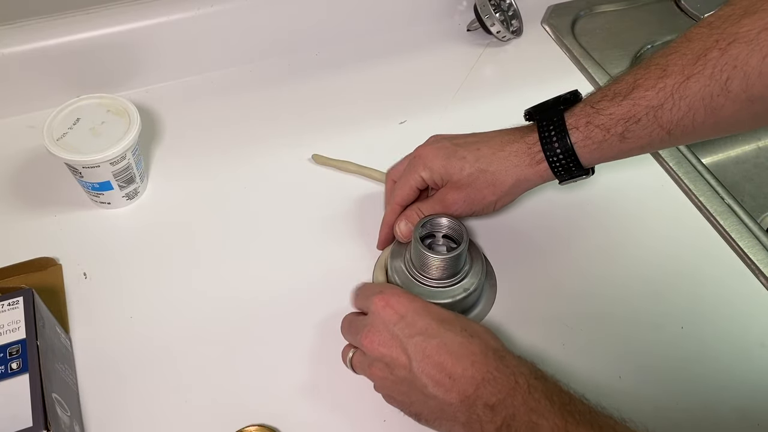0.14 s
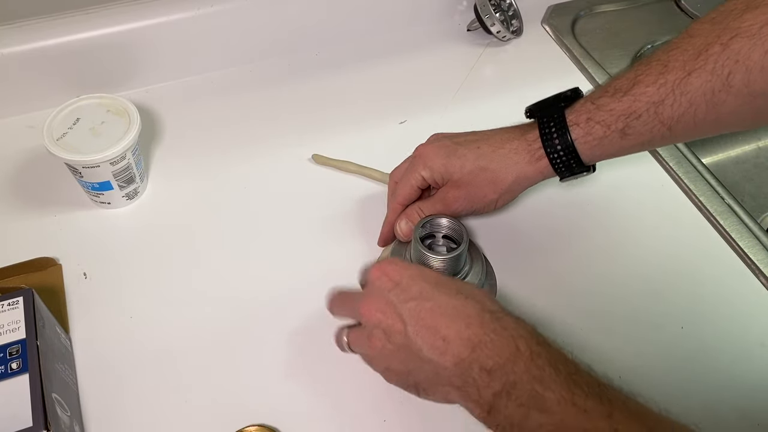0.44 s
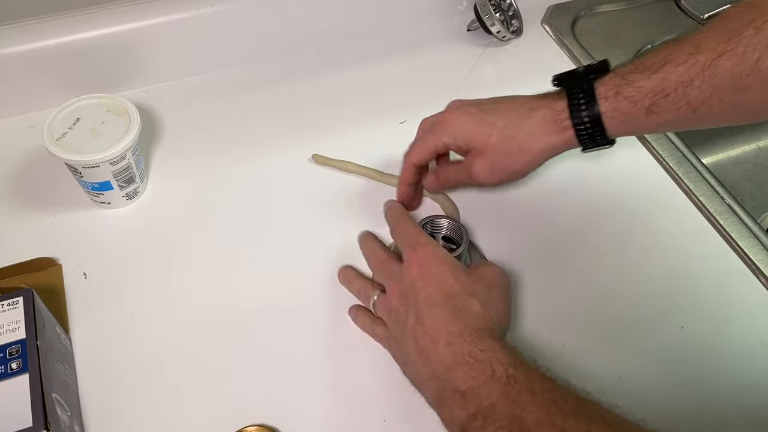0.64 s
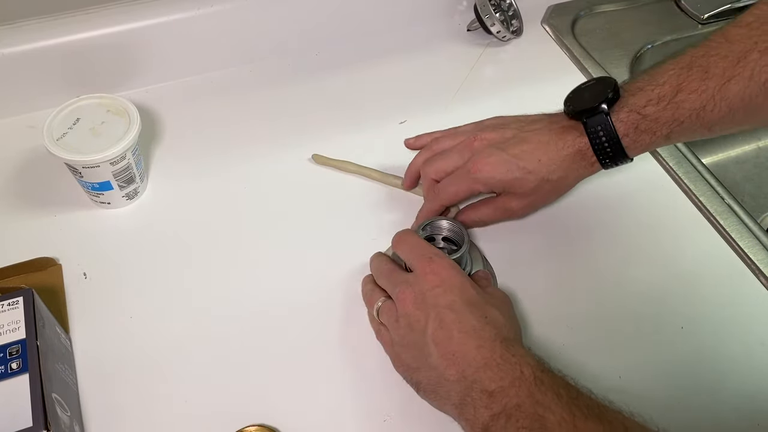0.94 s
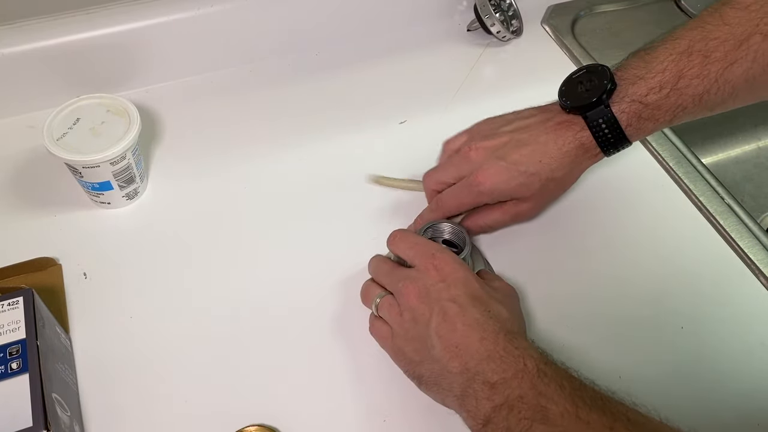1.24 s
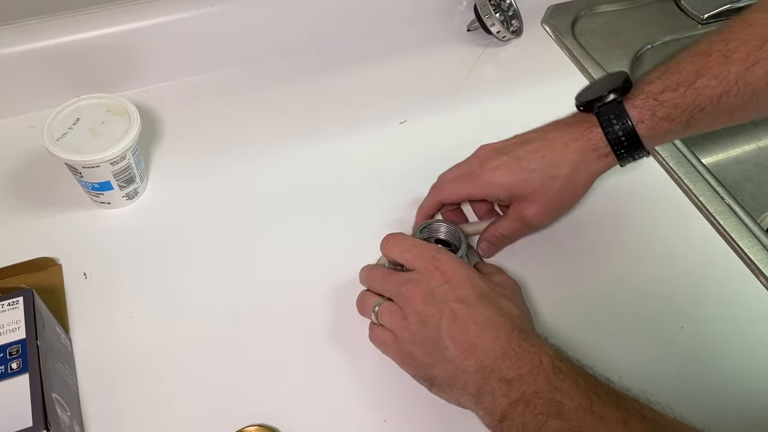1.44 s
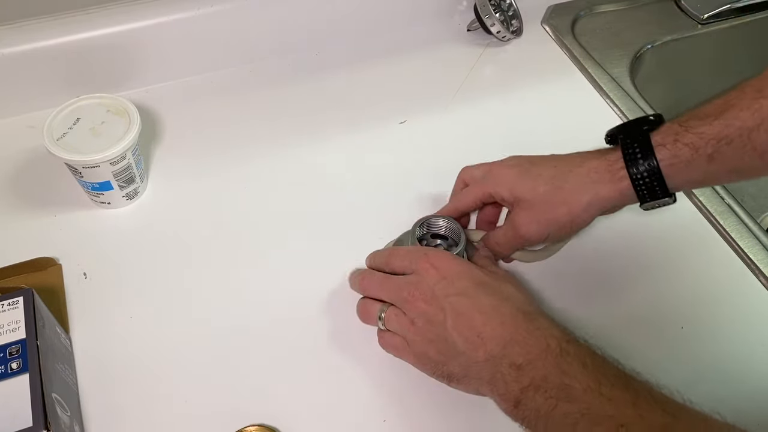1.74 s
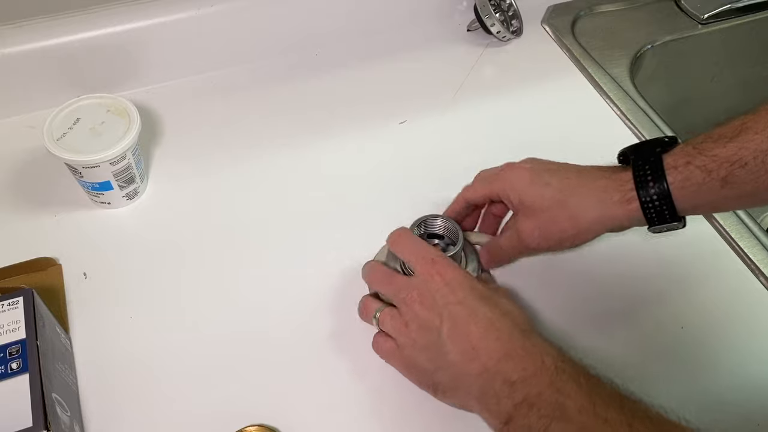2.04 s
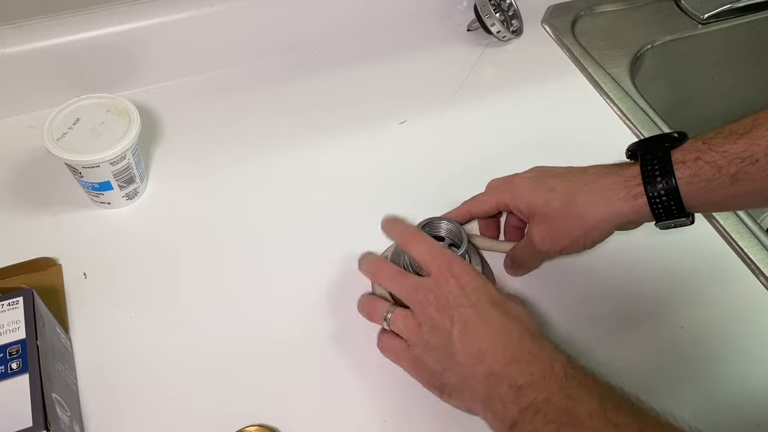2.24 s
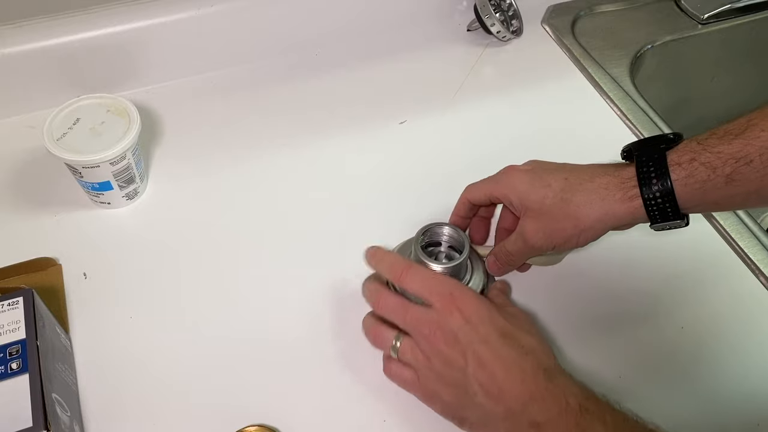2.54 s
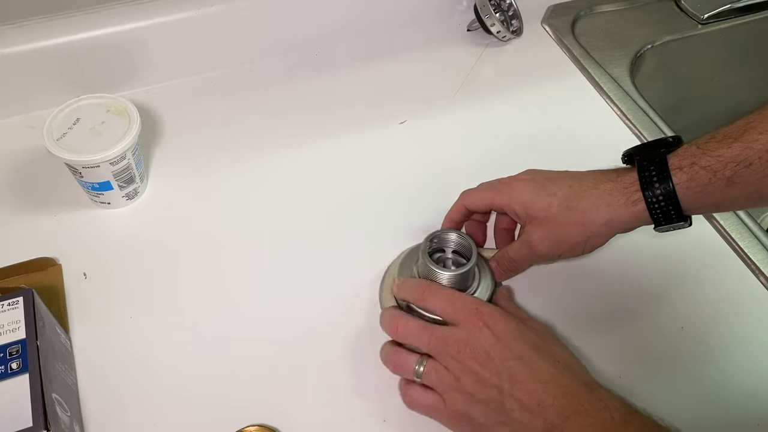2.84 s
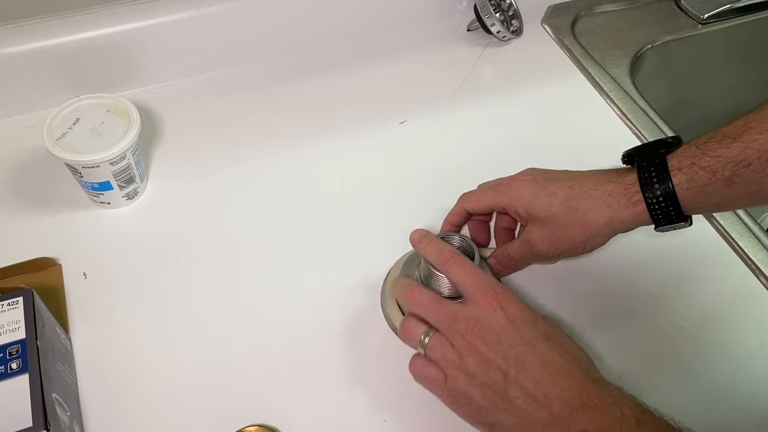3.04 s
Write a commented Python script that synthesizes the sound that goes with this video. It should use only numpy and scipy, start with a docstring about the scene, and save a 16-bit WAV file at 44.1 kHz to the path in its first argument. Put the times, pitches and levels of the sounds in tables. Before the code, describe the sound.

A steel sink strainer rubs and lightly clinks as hands turn it on a counter.

```python
"""A steel sink strainer rubs and clinks as two hands turn it and press putty round its rim.
Skin slips on metal in short, hissy strokes; the rim ticks, drags and rings faintly.
The kitchen counter under it knocks, bumps softly and thuds when an arm leans on it.
Behind this an appliance hums in the small, hard-walled room."""
import sys
import numpy as np
from scipy import signal
from scipy.fft import rfft, irfft
from scipy.io import wavfile

SR = 44100
rng = np.random.default_rng(int(sys.argv[2]) if len(sys.argv) > 2 else 0)


def unload_audio(sound):
    """Save the sound as a 16-bit wav file, at the path given as the first command line argument."""
    columns = np.transpose(np.atleast_2d(sound))
    # keep every value between -1 and 1, then stretch to whole-number steps
    steps = np.round(np.clip(columns, -1, 1) * 32767)
    wavfile.write(sys.argv[1], SR, steps.astype(np.int16))


N = 141120  # 3.2 s

# rubbing strokes: t/s, length/s, level/dB, treble tilt/(dB per octave)
STROKES = [(.004, 0.014, -56, 0), (0.033, 0.033, -55, -0.5), (0.437, 0.013, -62, -2.5),
           (0.452, 0.022, -53.5, -4), (0.502, 0.022, -58.5, -1.5), (0.772, 0.093, -56.5, 0.6),
           (0.882, .11, -57, -1), (1.056, 0.047, -62, 1.5), (1.12, 0.25, -60, -1),
           (1.338, 0.15, -52.5, -0.5), (1.437, 0.13, -52, 1.5), (1.593, 0.12, -56, 1),
           (1.798, .055, -64.5, 2), (1.963, 0.049, -54.5, -1), (2.016, .10, -52, 3), (2.133, 0.075, -50, 1),
           (2.248, 0.18, -61, -2.5), (2.389, 0.026, -51, -0.5), (2.403, 0.093, -50, 2),
           (2.522, 0.13, -55, 0.5), (2.661, 0.13, -58, -1.5), (2.798, 0.14, -53, 1),
           (2.919, 0.12, -52.5, -1), (3.146, 0.048, -54, -1.5)]
# tone of the rubbing: f/Hz, level/dB
RUB_TONE = [(150, -16), (400, 12), (900, 4.5), (1500, 1), (2500, -2), (3600, -2.5), (5200, 0.5),
            (6500, -0.5), (8400, 2), (10500, -4.5), (13000, -8.5), (16000, -13.5)]
# the strainer's modes (the notes it rings at): f/Hz, level/dB, time to fade by 60 dB/s
STEEL_MODES = [(2420, -11, .2), (2810, -10, .15), (3062, -1, .24), (3385, -11, .25), (3876, -9, .2),
               (4230, -9, .2), (4519, -1, .36), (5400, -8, .12), (6080, -9, .2), (6440, -7, .14),
               (7380, -9, .15), (7690, -6, .14), (7930, -7, .09), (8510, -7, .08), (8700, -8, .08),
               (9000, -9, .1), (9500, -10, .15), (11260, -11, .2), (11650, -10, .2)]
# touches that ring the steel: t/s, level/dB, favoured f/Hz, rise/s, damping by the grip/(dB per s)
CLINKS = [(0.01, -54.5, 6250, .001, 132), (0.015, -55.5, 3620, 0.00086, 132), (1.409, -61, 4450, .01, 20),
          (1.52, -48, 2820, .008, 40), (2.19, -60, 4500, .01, 21), (2.455, -51, 2480, 0.0013, 60),
          (2.879, -69, 3060, .008, 7), (2.95, -50.5, 3030, 0.0038, 30), (3.005, -37.5, 8360, .001, 262),
          (3.006, -52, 3060, 0.0033, 33), (3.025, -49.5, 4570, 0.0045, 45), (3.17, -55, 4530, .003, 38)]
# ticks of the rim: t/s, level/dB, centre f/Hz, fade/s
TICKS = [(.6282, -45, 5550, 0.0012), (.849, -52, 1040, 0.0027), (1.414, -50, 7400, .0015),
         (1.99, -50, 6800, .002), (2.178, -48, 8000, 0.0018), (2.402, -49, 4500, 0.0011),
         (2.67, -50, 7020, 0.0035), (2.733, -49, 7840, 0.0038), (2.95, -45.5, 7100, 0.0036),
         (3.004, -41.5, 8200, 0.0034), (3.008, -38.5, 8300, .003)]
# knocks on the counter: t/s, level/dB, centre f/Hz, fade/s, ring level/dB
KNOCKS = [(.629, -52, 2670, .005, -74), (.909, -44.5, 975, 0.021, -42), (1.264, -49, 1780, 0.0071, -48),
          (1.377, -54, 1700, 0.0063, -44), (1.403, -57, 1800, 0.018, -55), (2.402, -53, 2380, 0.007, -52),
          (2.455, -58, 2650, 0.0095, -62)]
# hollow ring of a knock: f/Hz, level/dB, time to fade by 60 dB/s
KNOCK_MODES = [(680, 2, .2), (860, -1, .17), (1077, 0, .22), (1215, -5, .2), (1398, 0, .2), (1610, -3, .12),
               (1741, 1, .13), (1800, 3, .11), (2140, -8, .15), (2710, -5, .15), (3860, -4, .15)]
# soft pushes on the counter: t/s, length/s, relative level/dB, favoured f/Hz
BUMPS = [(0.036, 0.055, -50.5, 544), (0.316, 0.044, -47, 452), (0.446, 0.08, -47.5, 416),
         (0.522, 0.044, -43, 334), (0.839, 0.033, -41, 553), (0.903, 0.026, -42.5, 640),
         (1.064, 0.015, -46, 330), (1.12, 0.025, -47, 447), (1.212, 0.062, -43.5, 185),
         (1.258, 0.11, -50.5, 770), (1.348, 0.069, -45.5, 354), (1.47, .04, -38.5, 377),
         (1.505, 0.045, -51, 407), (1.569, 0.17, -48, 630), (1.638, 0.033, -45, 495),
         (1.949, 0.028, -45.5, 420), (1.987, 0.041, -41, 388), (2.053, 0.016, -38, 565),
         (2.098, 0.17, -53.5, 494), (2.369, 0.17, -51.5, 460), (2.497, 0.02, -43.5, 600),
         (2.603, 0.016, -47, 370), (2.663, 0.039, -45, 400), (2.724, 0.095, -50, 447),
         (2.839, 0.044, -48, 322), (2.893, 0.06, -46.5, 520), (2.977, 0.048, -43.5, 405),
         (3.112, 0.047, -45.5, 497)]
# tone of a push: f/Hz, level/dB
BUMP_TONE = [(60, -27), (170, 12.5), (250, -4.5), (320, -2.5), (460, -6.5), (600, 0), (760, -19.5),
             (1100, -16), (2500, -29), (8000, -59)]
# the counter's low modes: f/Hz, level/dB, time to fade by 60 dB/s
COUNTER_MODES = [(314, -1, .13), (352, -2, .12), (406, 1.5, .17), (433, -5, .15), (523, -1, .2),
                 (598, -1, .12), (675, -6, .12)]
# an arm leaning on the counter: t/s, level/dB
THUDS = [(0.771, -31.5), (1.201, -41), (3.096, -40)]
# tones of the appliance: f/Hz, level/dB
HUM = [(120, -43), (194, -70), (523, -69), (2037, -82)]
# the room's rumble and hiss: f/Hz, relative level/dB
AIR_TONE = [(4, 18.5), (9, 18), (16, 6.5), (25, -1), (35, 3), (49, 6), (62, 4.5), (80, -3), (110, -3),
            (160, -17), (250, -20.5), (330, -23.5), (600, -23.5), (1000, -28.5), (2000, -34), (4000, -40),
            (8500, -45), (16000, -52)]
# the room's echo: f/Hz, time to fade by 60 dB/s
ECHO_TIMES = [(100, 0.6), (500, 0.41), (2000, 0.51), (8000, 0.35), (16000, 0.73)]


def rubbing():
    """Tiny slips of skin on steel make a grainy hiss that sets the strainer ringing."""
    out, t = np.zeros(N), np.arange(SR // 2) / SR
    slips_per_s, slip_share, pressure_db, ring_db = 1000, 0.49, 1.7, -13.5
    for start, length, db, tilt in STROKES:
        sizes = amp(np.minimum(rng.exponential(1, len(t)), 4))
        signs = rng.choice([-1, 1], len(t))
        slips = unit(sizes * signs * (rng.random(len(t)) < slips_per_s / SR))
        friction = np.sqrt(slip_share) * slips + np.sqrt(1 - slip_share) * noise(len(t))
        hiss = colour(friction, lambda hz: rub_tone(hz, tilt) + shimmer(hz))
        pressure = unit(amp(pressure_db * wander(len(t), rate_hz=45)))  # the hand presses unevenly
        swell = envelope(t, length, rise=0.49 * length, fall=0.046)
        add(out, start, amp(db) * hiss * pressure * swell)
    return room(out + amp(ring_db) * ring(out, STEEL_MODES), echo_db=-6)


def rub_tone(hz, tilt):
    """A stroke's tone in dB, made brighter or duller above 900 Hz."""
    return read(RUB_TONE, hz) + tilt * np.log2(np.maximum(hz, 900) / 900)


def shimmer(hz, depth_db=5, spacing_hz=78):
    """Each new grip gives the steel's treble new narrow peaks and dips, in dB."""
    heights = np.minimum(noise(2000), 1.2)
    ripple = np.interp(hz / spacing_hz, np.arange(len(heights)), heights)
    return depth_db * ripple * np.minimum(hz / 3000, 1)


def clinks():
    """The steel rings when touched, longest where it is held loosely."""
    out = np.zeros(N)
    for start, db, centre_hz, rise, grip in CLINKS:
        add(out, start, amp(db) * struck(STEEL_MODES, band(centre_hz, octaves=0.12), rise, grip))
    return room(out, echo_db=-11)


def ticks():
    """Brief contacts of the rim make sharp clicks."""
    return room(blows(TICKS, octaves=0.65, rise=0.0002), echo_db=-3)


def rasp():
    """The rim catches and drags once, in gritty slips."""
    out, t = np.zeros(N), np.arange(SR // 4) / SR
    start, db = 1.518, -48
    grit = noise(len(t)) ** 3  # cubing makes the noise spiky
    scrape = colour(grit, band(centre_hz=3700, octaves=0.5))
    add(out, start, amp(db) * scrape * envelope(t, length=0.025, rise=0.003, fall=0.028))
    return room(out, echo_db=-6)


def knocks(rise=0.004):
    """Duller, cushioned blows on the counter leave a short hollow ring."""
    out = blows(KNOCKS, octaves=0.71, rise=rise)
    for start, _, centre_hz, _, ring_db in KNOCKS:
        hollow = struck(KNOCK_MODES, band(centre_hz, octaves=0.6), rise, grip_db_per_s=55)
        add(out, start, amp(ring_db) * hollow)
    return room(out, echo_db=-3.5)


def bumps(direct_db=-10, ring_db=-11):
    """Soft pushes of hands and strainer sound the counter's low notes."""
    out, t = np.zeros(N), np.arange(SR // 4) / SR
    for start, length, db, centre_hz in BUMPS:
        favoured = band(centre_hz, octaves=0.62)
        push = colour(noise(len(t)), lambda hz: read(BUMP_TONE, hz) + favoured(hz))
        shape = envelope(t, length, rise=0.0041, fall=0.015)
        add(out, start, amp(db) * rms(shape) * unit(push * shape))
    return room(amp(direct_db) * out + amp(ring_db) * ring(out, COUNTER_MODES), echo_db=-3)


def thuds(swing_hz=51.4, rise=0.028):
    """Under a leaning arm the whole counter swings to and fro a few times."""
    out, t = np.zeros(N), np.arange(SR // 3) / SR
    swell = t / rise * np.exp(1 - t / rise)
    for start, db in THUDS:
        add(out, start, amp(db) * swell * np.sin(2 * np.pi * swing_hz * t))
    return out


def background(air_db=-36):
    """An appliance's slightly wavering hum, over low rumble and faint hiss."""
    t = np.arange(N) / SR
    hum = sum(amp(db) * np.sqrt(2) * np.sin(2 * np.pi * (hz * t + rng.random())) for hz, db in HUM)
    waver = 1 + 0.08 * wander(N, rate_hz=36)
    air = colour(noise(N), lambda hz: read(AIR_TONE, hz))
    return hum * waver + amp(air_db) * air


def room(x, echo_db, echoes_per_s=5000):
    """The walls return many tiny echoes; each pitch fades at its own speed."""
    echoes = noise(SR // 2) * (rng.random(SR // 2) < echoes_per_s / SR)
    echoes[:SR // 250] = 0  # the first echo needs 4 ms to return
    hz, t, spectrum = signal.stft(echoes, SR, nperseg=256)
    fade = amp(-60 * t / read(ECHO_TIMES, hz)[:, None])
    tail = signal.istft(spectrum * fade, SR, nperseg=256)[1]
    return x + amp(echo_db) * signal.fftconvolve(x, tail / np.linalg.norm(tail))[:N]


def blows(rows, octaves, rise, top_hz=9800):
    """Short bursts of noise from contacts too soft to sound much above top_hz."""
    out, t = np.zeros(N), np.arange(SR // 10) / SR
    for start, db, centre_hz, fall, *_ in rows:
        favoured = band(centre_hz, octaves)
        burst = colour(noise(len(t)), lambda hz: favoured(hz) - 10 * np.log10(1 + (hz / top_hz) ** 6))
        shape = envelope(t, rise, rise, fall)
        add(out, start, amp(db) * rms(shape) * unit(burst * shape))
    return out


def struck(modes, favoured, rise, grip_db_per_s):
    """An object rings once: the contact picks the notes and the grip damps them."""
    t = np.arange(SR // 2) / SR
    hz, db, fade_s = np.transpose(modes)[:, :, None]
    weights = amp(db + favoured(hz))
    fade = amp(-(60 / fade_s + grip_db_per_s) * t)
    tones = fade * np.sin(2 * np.pi * (hz * t + rng.random(hz.shape)))
    return np.minimum(t / rise, 1) * (weights / np.linalg.norm(weights) * tones).sum(0)


def ring(x, modes):
    """The sound x shakes an object; each mode's level sets its share of the energy."""
    t = np.arange(SR // 2) / SR
    body = sum(amp(db - 60 * t / fade_s) / np.sqrt(fade_s) * np.cos(2 * np.pi * hz * t)
               for hz, db, fade_s in modes)
    return unit(signal.fftconvolve(x, body)[:N]) * rms(x)


def envelope(t, length, rise, fall):
    """Rises smoothly, holds until length, then fades; all in seconds."""
    swell = np.sin(np.pi / 2 * np.minimum(t / rise, 1)) ** 2
    return swell * np.exp(-np.maximum(t - length, 0) / fall)


def band(centre_hz, octaves):
    """A curve from Hz to dB that favours pitches near the centre."""
    return lambda hz: -10 * np.log10(1 + (np.log2((hz + 1) / centre_hz) / octaves) ** 4)


def colour(x, gain_db):
    """Shapes the tone with a curve from Hz to dB; the result has strength 1."""
    hz = np.fft.rfftfreq(len(x), 1 / SR)
    return unit(irfft(rfft(x) * amp(gain_db(hz)), len(x)))


def wander(size, rate_hz):
    """Random drift, mostly slower than rate_hz."""
    return colour(noise(size), lambda hz: -20 * np.log10(1 + (hz / rate_hz) ** 2))


def noise(size):
    """Plain white noise."""
    return rng.standard_normal(size)


def read(points, hz):
    """Reads between a table's rows along a pitch (log-frequency) scale."""
    row_hz, values = np.transpose(points)
    return np.interp(np.log(hz + 1), np.log(row_hz + 1), values)


def add(mix, start, sound):
    """Mixes a sound in at start seconds."""
    part = mix[max(round(start * SR), 0):][:len(sound)]
    part += sound[:len(part)]


def amp(db):
    """Turns decibels into a multiplier."""
    return 10 ** (np.asarray(db) / 20)


def rms(x):
    """A signal's average strength (root mean square)."""
    return np.sqrt(np.mean(x ** 2) + 1e-20)


def unit(x):
    """Scales to strength 1."""
    return x / rms(x)


def scene():
    """All the sounds together in one channel."""
    return (background() + rubbing() + ticks() + clinks() + knocks() + bumps() + thuds() + rasp())[None]


def record(dry, cutoff_hz=15750):
    """Cuts off the very highest treble."""
    lowpass = signal.firwin(511, cutoff_hz, window=("kaiser", 9), fs=SR)
    return signal.oaconvolve(dry, lowpass[None], "same")


dry = scene()
out = record(dry)
unload_audio(out)
```